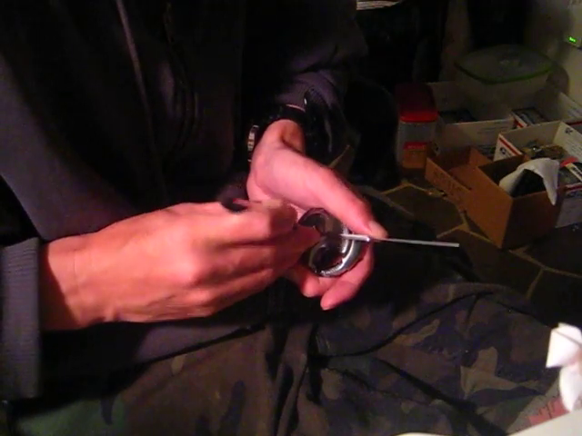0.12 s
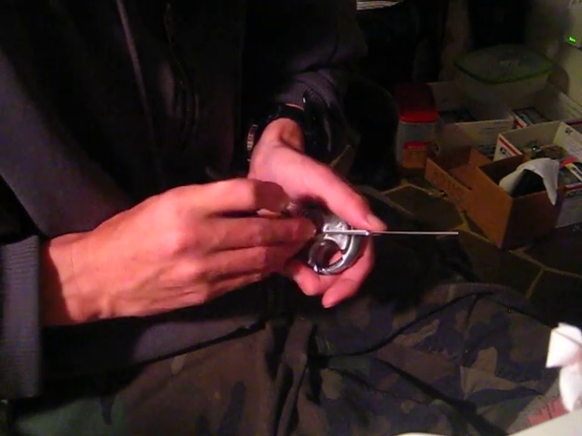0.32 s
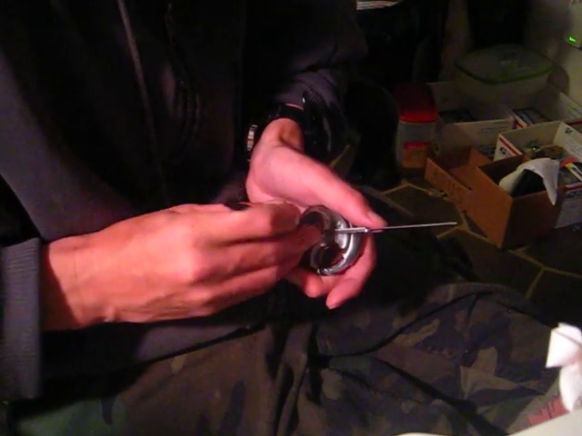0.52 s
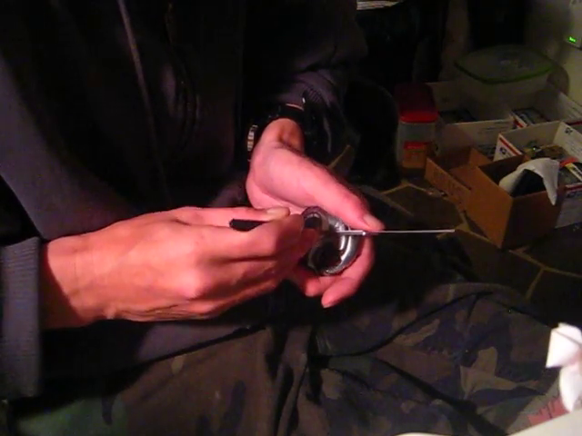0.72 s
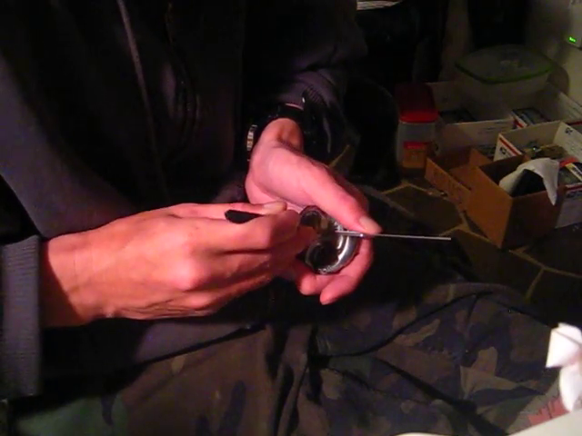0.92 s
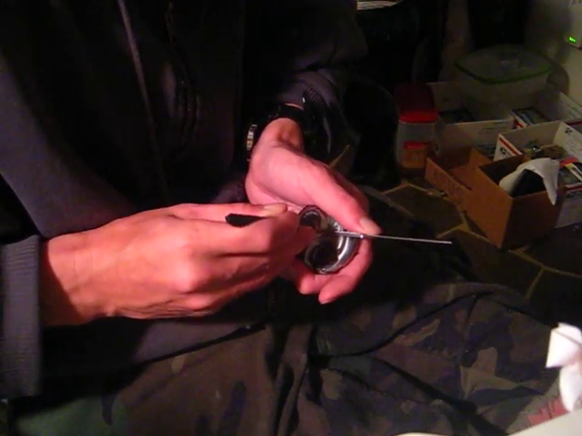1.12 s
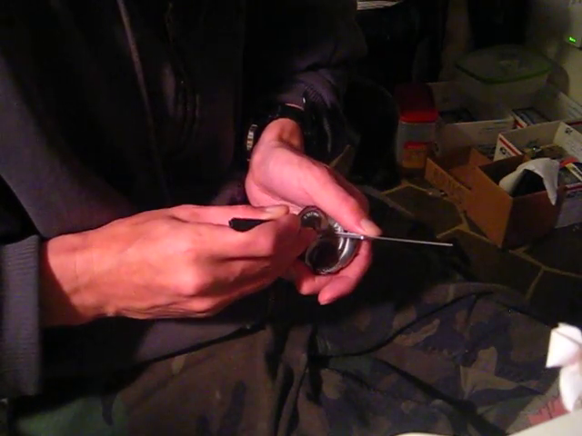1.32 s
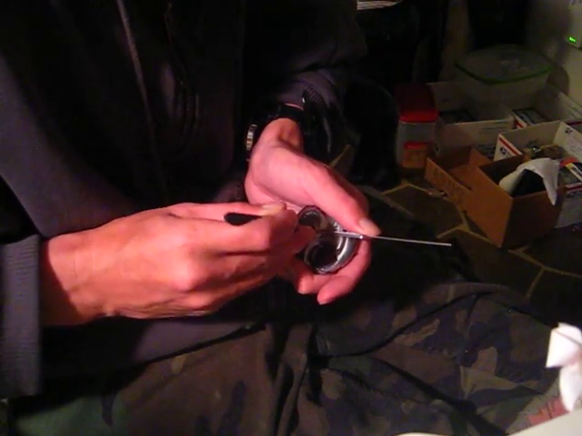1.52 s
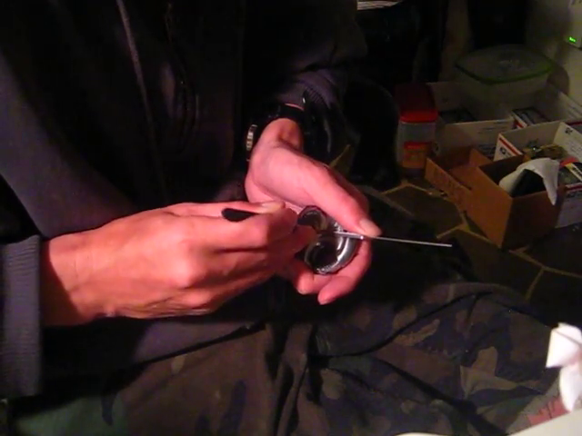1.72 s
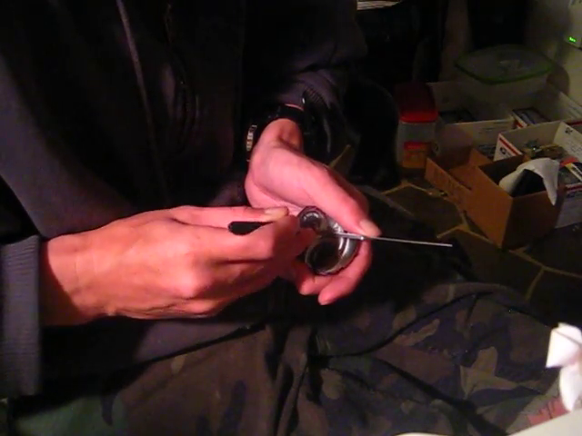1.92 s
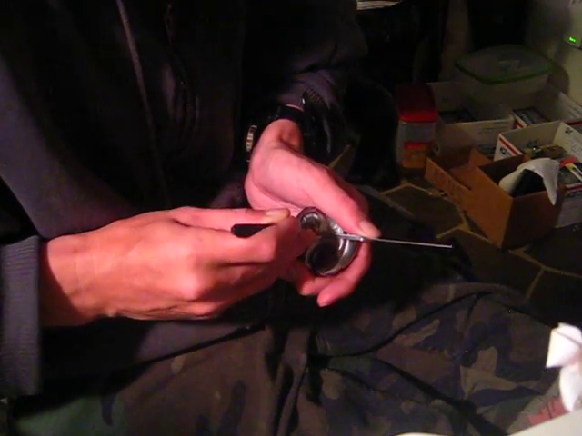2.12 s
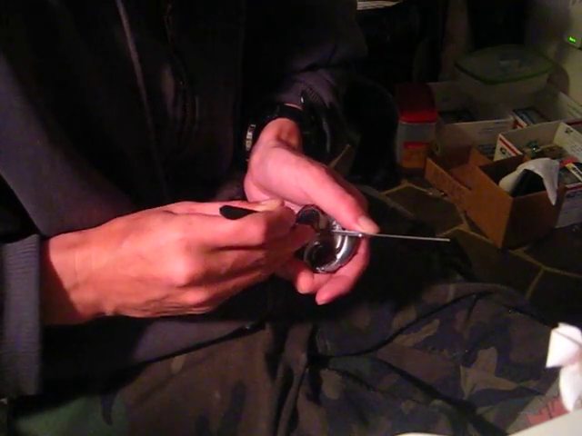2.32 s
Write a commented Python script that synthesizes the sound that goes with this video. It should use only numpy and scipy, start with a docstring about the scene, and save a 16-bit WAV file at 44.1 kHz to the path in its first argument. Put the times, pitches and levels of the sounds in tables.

```python
"""Picking a padlock

A steel pick works the pins of a hand-held padlock, close to a camera in a small, furnished room.
Each contact rings the lock's modes for a few milliseconds, damped by the hand, with a grain of skid noise;
twice the pick slides in a rush of tiny catches. Near surfaces echo the lock and the room adds a short tail.
Underneath lie the camera's steady filtered-noise hiss, its thin sine whine and dull bumps of hands and sleeves."""
import sys
import numpy as np
from scipy import signal
from scipy.fft import rfft, irfft
from scipy.io import wavfile

SR = 44100
rng = np.random.default_rng(int(sys.argv[2]) if len(sys.argv) > 2 else 0)


def master(y):
    """Save y as 16-bit WAV."""
    cut = np.clip(np.atleast_2d(y).T, -1, 1)
    pcm = np.round(cut * 32767)  # scale
    wavfile.write(sys.argv[1], SR, pcm.astype(np.int16))


N = 110250  # length in samples


def amp(db):
    """Decibels to gain."""
    return 10 ** (np.asarray(db) / 20)


def gain_at(hz, points):
    """Gain of a (Hz, dB) curve, interpolated on a log-frequency axis."""
    curve_hz, curve_db = np.array(points, float).T
    return amp(np.interp(np.log(np.maximum(hz, 1)), np.log(curve_hz), curve_db))


def colour(x, points):
    """Filter by a (Hz, dB) curve."""
    bin_hz = np.fft.rfftfreq(len(x), 1 / SR)
    return irfft(rfft(x) * gain_at(bin_hz, points), len(x))


def add(out, x, start_s):
    """Mix x into out from a given time."""
    first = max(int(round(start_s * SR)), 0)
    out[first:first + len(x)] += x[:len(out) - first]


def grains(per_s):
    """Randomly timed impulses of random size."""
    return (rng.random(N) < per_s / SR) * rng.standard_normal(N)


def unit(x):
    """Scale to rms 1."""
    return x / np.sqrt(np.mean(x ** 2) + 1e-18)


# Spectrum of the background hiss. Each row: frequency in Hz, density in dB per Hz.
HISS_SPECTRUM = [(20, -87.5), (65, -84), (160, -85.5), (450, -87.5), (1000, -90), (2200, -91.5),
                 (3100, -92), (5700, -93), (7000, -96), (7700, -94.5), (8300, -96.5), (9400, -93),
                 (10700, -87.5), (12000, -93.5), (12800, -99.5), (13400, -94.5), (14600, -91.5),
                 (15600, -93)]


def hiss():
    """Smooth microphone hiss over a little low room noise: white noise filtered to one curve."""
    return colour(rng.standard_normal(N), HISS_SPECTRUM) * np.sqrt(SR / 2)  # unit density per Hz before the curve


# Tones of the camera's whine. Each row: frequency in Hz, restarts per second (once for each picture).
WHINE_TONES = [(7569, 30), (7867, 29.97), (11628, 29.97), (15138, 30), (15734, 29.97)]
# Level of each of those tones, in order. Each entry: rms level in dB.
WHINE_LEVELS = [-56.5, -60.5, -67, -64.5, -69]


def whine():
    """Thin steady tones of the camera's electronics: sines that restart with every picture frame."""
    t = np.arange(N) / SR
    out = np.zeros(N)
    for (hz, frame_rate), rms_db in zip(WHINE_TONES, WHINE_LEVELS):
        time_in_frame = (t + rng.random()) % (1 / frame_rate)
        out += np.sqrt(2) * amp(rms_db) * np.sin(2 * np.pi * hz * time_in_frame)
    return out


def background(top_hz=15800):
    """The camera's own hiss and whine, which stop short of the clicks' highest treble."""
    kept_bins = np.fft.rfftfreq(N, 1 / SR) < top_hz
    return irfft(rfft(hiss() + whine()) * kept_bins, N)


# Dull colour of the bumps of hands and sleeves. Each row: frequency in Hz, gain in dB.
HANDLING_COLOUR = [(20, -10), (70, -1), (200, -5), (400, -10.5), (900, -11), (3000, -45)]
# Effort of the hands over time. Each row: time in seconds, change of handling level in dB.
HAND_EFFORT = [(0, -10), (.3, 9.5), (.5, -0.5), (.65, 5.5), (.95, 1), (1.1, -7), (1.65, -4), (1.83, 1.5),
               (2.15, -0.5), (2.5, 0)]
HANDLING_DB = -63.5  # rms level at an effort of 0 dB
BUMPS_PER_S, BUMP_DECAY_S = 120, .008


def handling(size=2048):
    """A faint uneven rumble as fingers and sleeves shift: decaying bursts of dull noise."""
    decay = np.exp(-np.arange(size) / SR / BUMP_DECAY_S)
    bumps = signal.fftconvolve(grains(BUMPS_PER_S), decay)[:N]
    rumble = unit(colour(bumps * rng.standard_normal(N), HANDLING_COLOUR))
    effort_db = np.interp(np.arange(N) / SR, *np.array(HAND_EFFORT).T)
    return amp(HANDLING_DB + effort_db) * rumble


# Frequencies in Hz at which each contact's colour is set.
CONTACT_COLOUR_HZ = [1800, 3824, 4410, 6730, 9870]
# Modes of lock and pick. Each row: frequency in Hz, t60 in seconds before the contact's ring factor, level in dB.
LOCK_MODES = [(3026, 0.0072, 2), (3240, 0.077, -15), (3970, 0.0061, 2.5), (4497, 0.0077, -2),
              (5560, 0.0067, -1.5), (6390, 0.0084, -1.5), (7150, 0.0053, -0.5), (7750, 0.0064, -1),
              (8450, 0.0053, 1), (9950, 0.0068, 2), (11140, 0.0054, -5.5)]
# Colour of the tip's brief skid. Each row: frequency in Hz, gain in dB.
SKID_COLOUR = [(100, -11), (700, -23), (1400, 0.5), (2500, 9), (5000, -5), (9000, 11), (12500, 4),
               (14200, 7), (15500, -9), (17000, -16)]
ATTACK_S, SKID_DECAY_S = 0.00015, .0006  # time constants


def click(levels, ring, skid_db, size=2048):
    """One contact: the modes it reaches ring and die away over a grain of noise as the tip skids."""
    t = np.arange(size) / SR
    reach = list(zip(CONTACT_COLOUR_HZ, levels))
    body = np.zeros(size)
    for hz, t60, db in LOCK_MODES:
        tone = np.sin(2 * np.pi * (hz * t + rng.random()))
        decay = np.exp(-np.log(1000) * t / (t60 * ring))
        body += amp(db) * gain_at(hz, reach) * tone * decay
    skid_noise = colour(rng.standard_normal(size), SKID_COLOUR)
    skid = colour(skid_noise, reach) * np.exp(-t / SKID_DECAY_S)
    rise = 1 - np.exp(-t / ATTACK_S)
    return rise * (body + amp(skid_db) * skid)


# Contacts of pick and pins. Each row: start in seconds, five levels in dB (one at each contact colour frequency),
# ring length as a multiple of the modes' own, skid level in dB.
PICK_CONTACTS = [ (0.0425, -33, -29, -38, -50, -52, 1.18, -5), (0.1417, -48, -45, -33.5, -32, -46, 1.0, -2),
                 (0.203, -33, -28, -34.5, -32, -23.5, 1.64, 4), (.3640, -48, -32.5, -31, -24, -25, 1.1, 4),
                 (0.4, -48, -42, -44, -45, -52, 1.4, -4), (0.4073, -38, -35, -39, -43, -52, 2.1, -8),
                 (.4342, -42, -42, -36, -44, -52, 1.2, -8), (0.4435, -17.5, -30.5, -14.5, -3, -17, 0.78, 1),
                 (.5055, -52, -48, -34, -33, -34.5, 0.98, 1), (1.5376, -51, -19, -29, -37, -34.5, 1.29, -9),
                 (1.9350, -35, -38.5, -23.5, -33, -22.5, 0.96, -6),
                 (2.1127, -45, -34, -36, -40, -23.5, 1.07, -4), ]


def padlock():
    """All contacts of the pick in the keyway, each ringing the lock afresh."""
    out = np.zeros(N)
    for start, *levels, ring, skid_db in PICK_CONTACTS:
        add(out, click(levels, ring, skid_db), start)
    return out


# Slides of the pick along the keyway. Each row: start in seconds, length in seconds, level in dB at the peak.
PICK_SLIDES = [(0.622, 0.3, -62), (1.59, 0.32, -60.5)]
# Colour of the sliding. Each row: frequency in Hz, gain in dB.
SLIDE_COLOUR = [(1500, -23), (2600, -8), (3030, 5), (3350, -4), (3800, -5), (4600, -17), (8000, -34)]


def sliding(catches_per_s=990):
    """Tiny catches of the moving pick stir the lock's lowest modes, swelling and fading."""
    t = np.arange(N) / SR
    swell = np.zeros(N)
    for start, length, db in PICK_SLIDES:
        progress = np.clip((t - start) / length, 0, 1)
        swell += amp(db) * np.sqrt(np.abs(np.sin(np.pi * progress)))
    return swell * unit(colour(grains(catches_per_s), SLIDE_COLOUR))


# Echoes from near surfaces. Each row: delay in seconds, level in dB.
NEAR_ECHOES = [(.0076, -19.5), (0.01, -15.5)]
# Colour of the room's tail. Each row: frequency in Hz, gain in dB.
ROOM_COLOUR = [(500, -8), (2300, -1), (3250, 5.5), (4300, 2.5), (6800, 0), (10000, -2), (15000, -9)]
ROOM_DB, ROOM_T60_S, ROOM_DELAY_S = -16.5, 0.19, .0068  # tail level before its colour, decay, onset


def room(x, size=16384):
    """Direct sound, two near echoes and a short diffuse tail of decaying noise."""
    t = np.arange(size) / SR
    tail = colour(rng.standard_normal(size), ROOM_COLOUR) * np.exp(-np.log(1000) * t / ROOM_T60_S)
    unit_energy = np.sqrt(2 * np.log(1000) / (ROOM_T60_S * SR))  # offsets the energy of the decay
    response = np.zeros(size)
    response[0] = 1  # direct sound
    add(response, amp(ROOM_DB) * tail * unit_energy, ROOM_DELAY_S)
    for delay, db in NEAR_ECHOES:
        add(response, amp([db]), delay)
    return signal.fftconvolve(x, response)[:N]


def scene():
    """Lock in its room, hands and background, the same in both channels."""
    mono = room(padlock() + sliding()) + handling() + background()
    return np.array([mono, mono])


OVERLOAD = 0.71  # amplitude at which the microphone stage saturates
TOP_HZ = 16500


def record(dry):
    """The microphone stage rounds the loudest click by soft saturation; a steep low-pass cuts the top."""
    lowpass = signal.ellip(10, .1, 80, TOP_HZ, fs=SR, output="sos")  # 0.1 dB ripple, 80 dB stopband
    saturated = OVERLOAD * np.tanh(dry / OVERLOAD)
    return signal.sosfilt(lowpass, saturated)


dry = scene()
out = record(dry)
master(out)
```